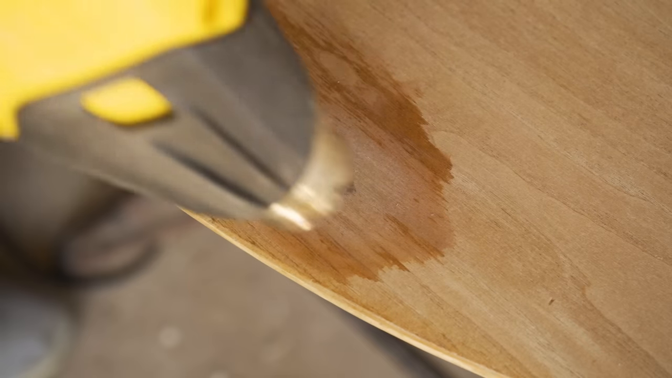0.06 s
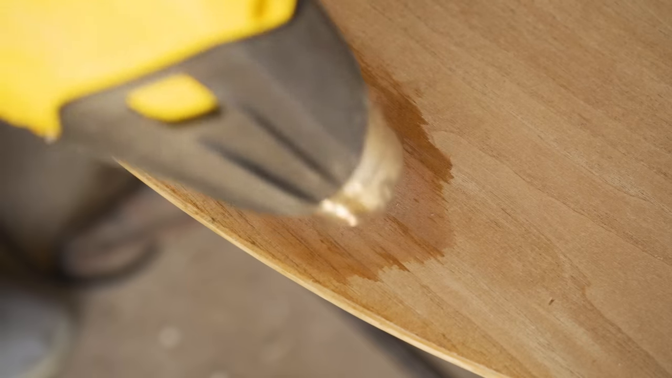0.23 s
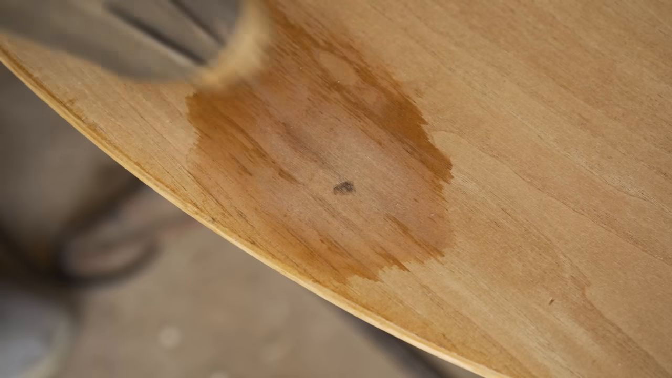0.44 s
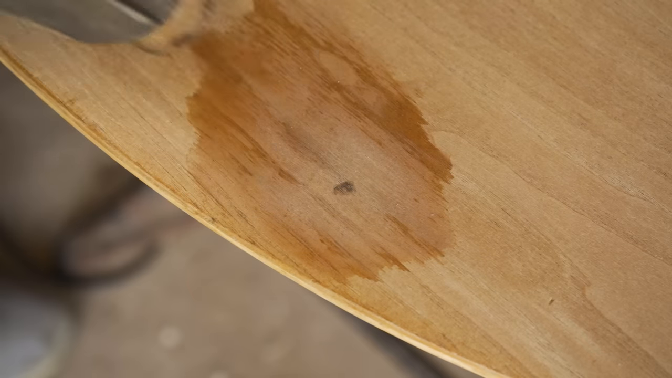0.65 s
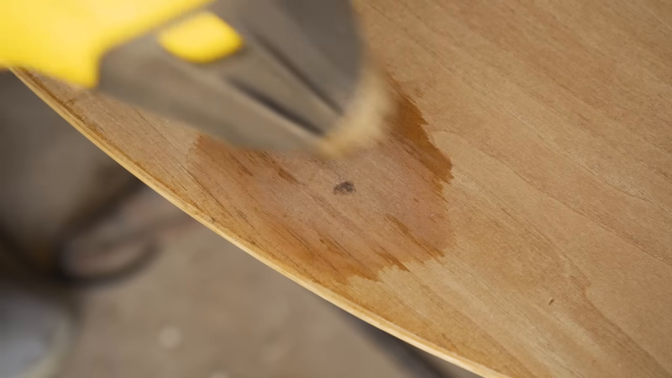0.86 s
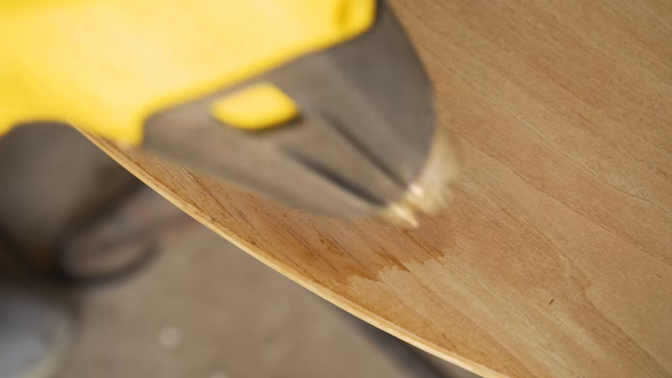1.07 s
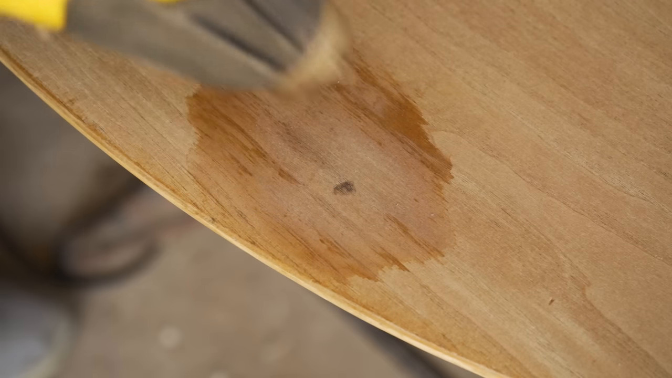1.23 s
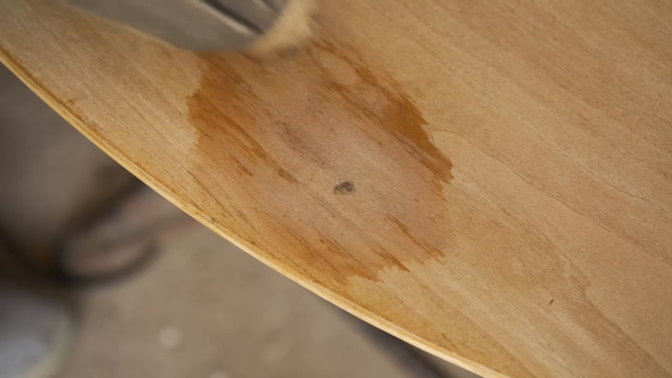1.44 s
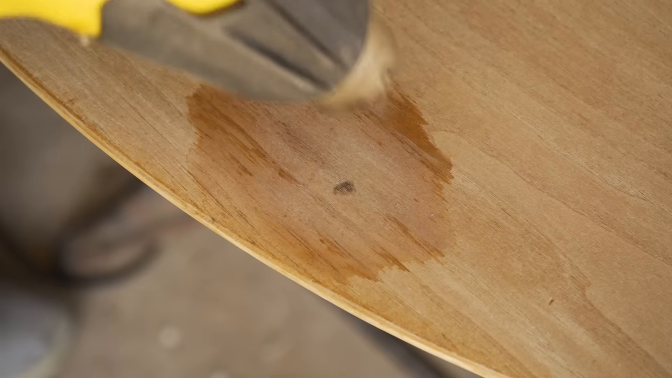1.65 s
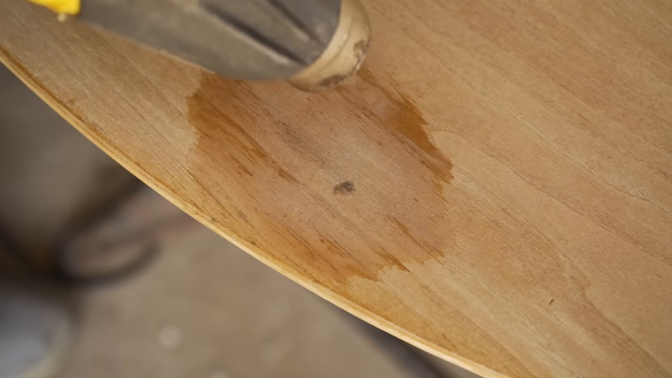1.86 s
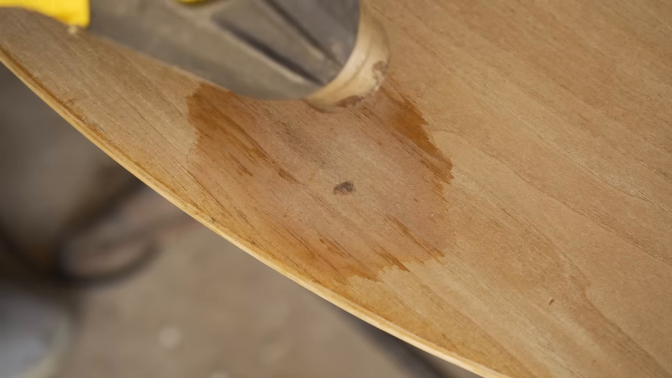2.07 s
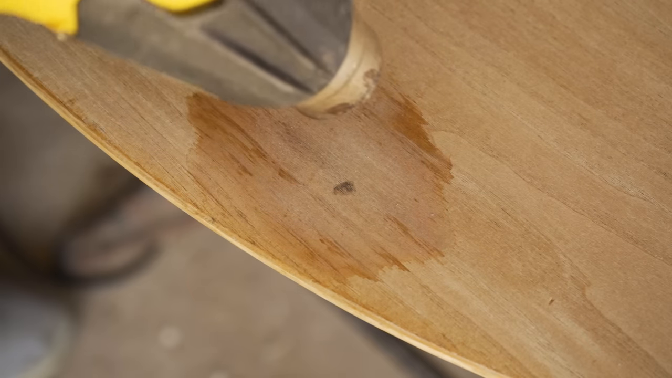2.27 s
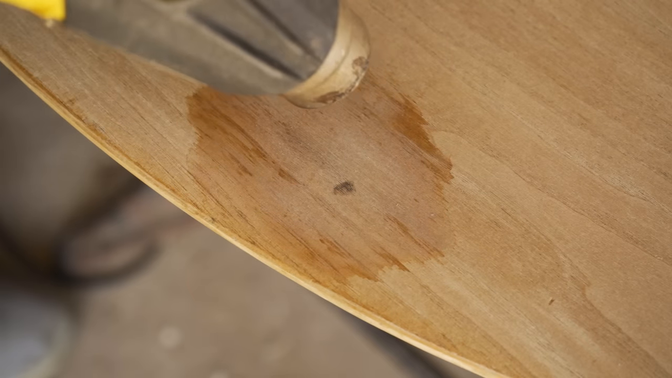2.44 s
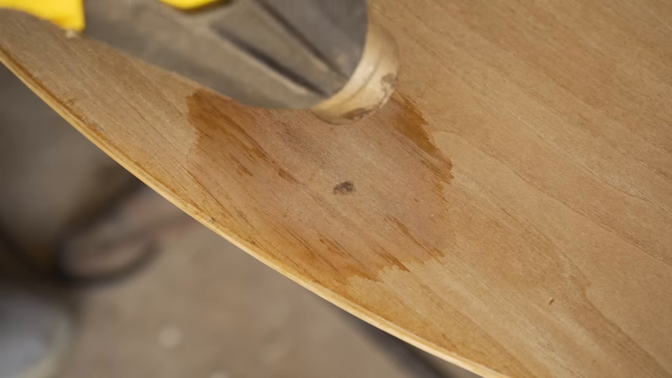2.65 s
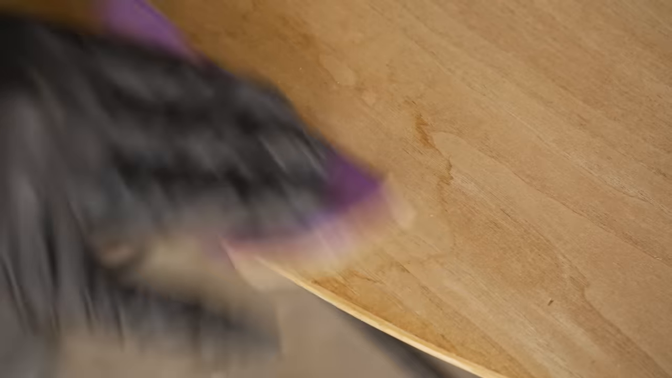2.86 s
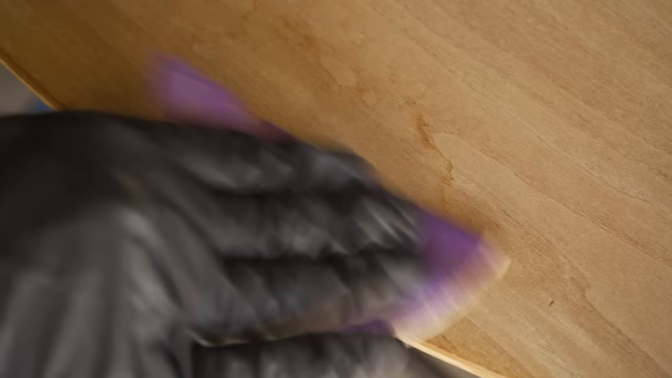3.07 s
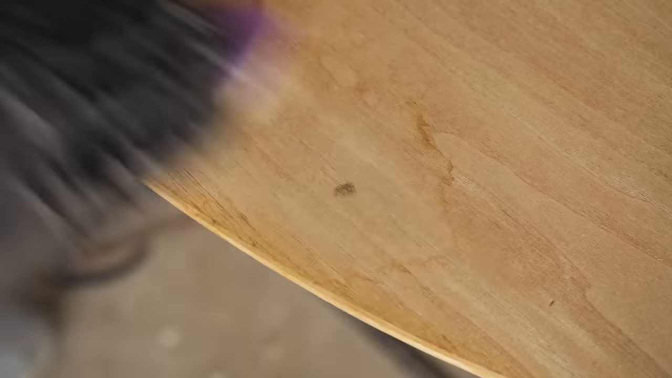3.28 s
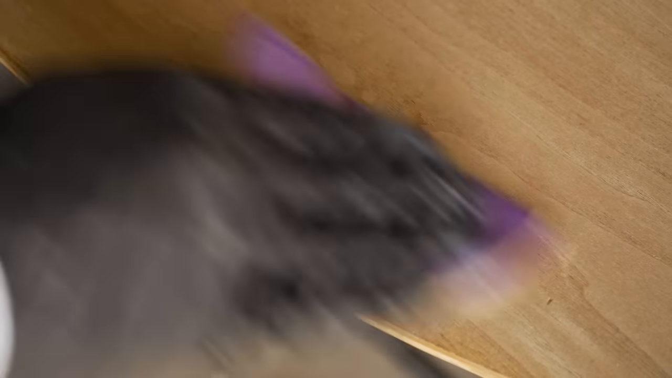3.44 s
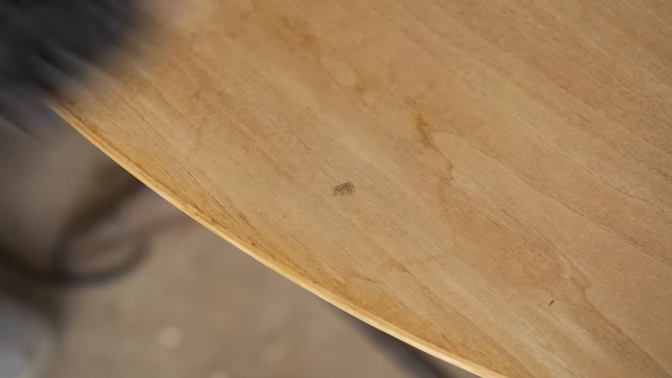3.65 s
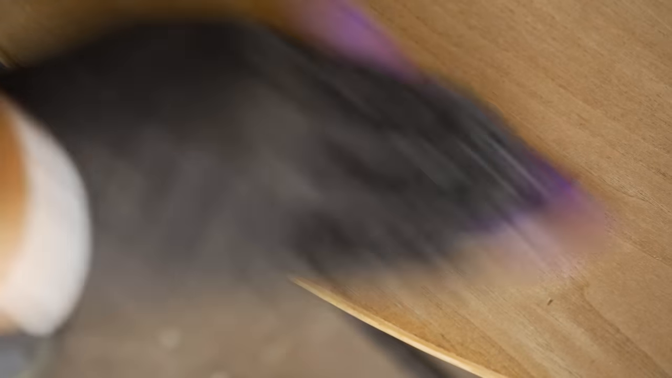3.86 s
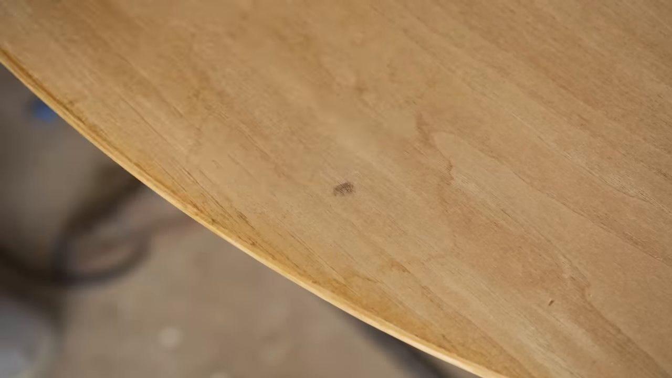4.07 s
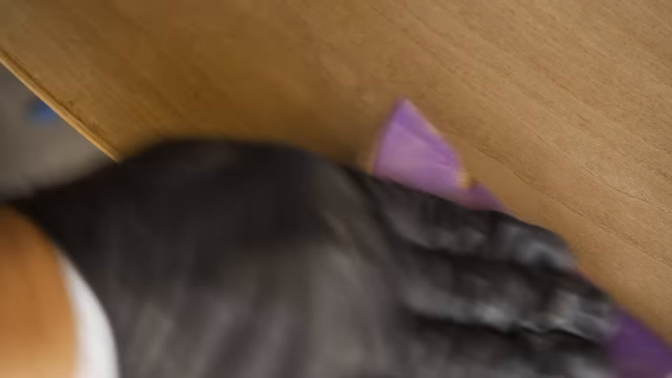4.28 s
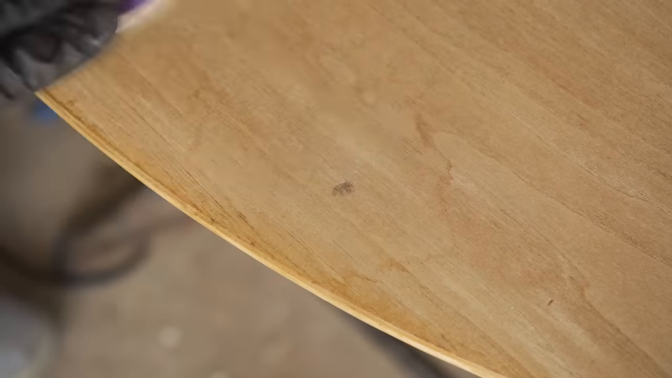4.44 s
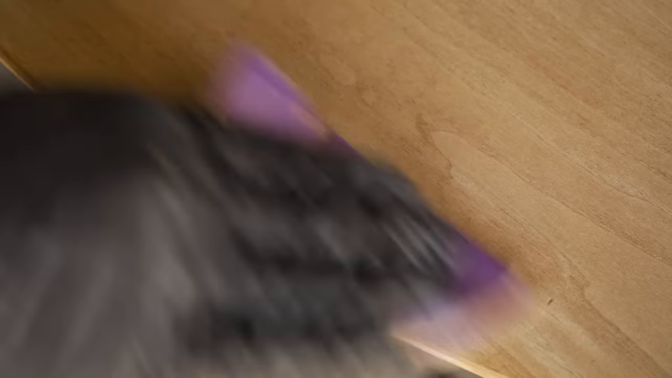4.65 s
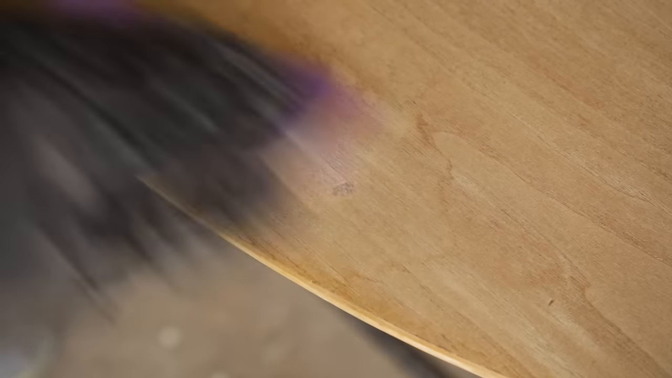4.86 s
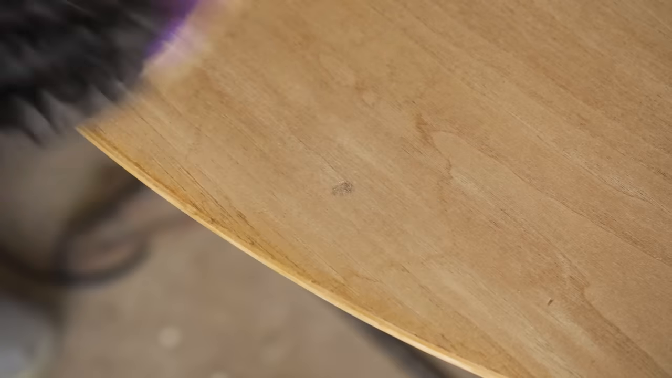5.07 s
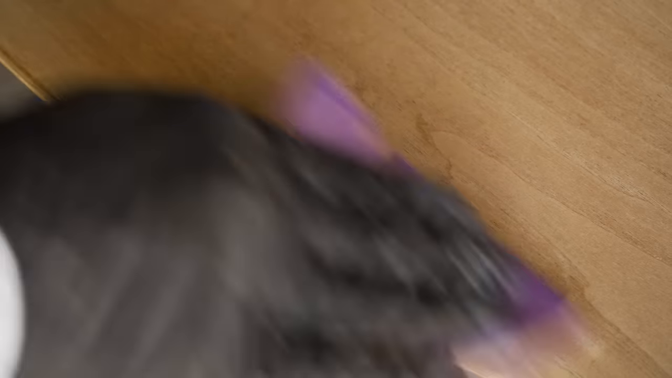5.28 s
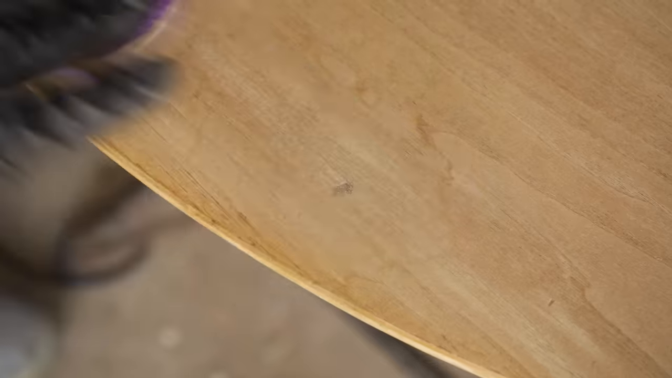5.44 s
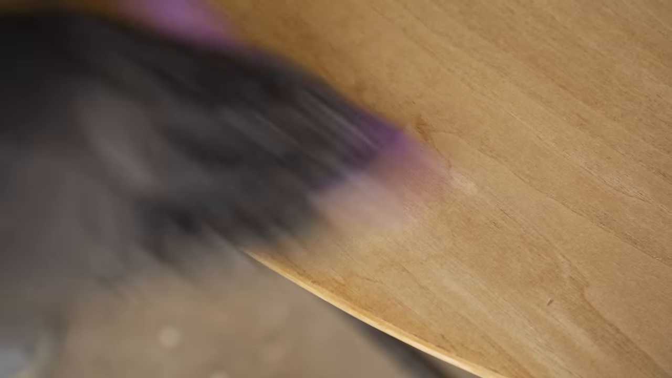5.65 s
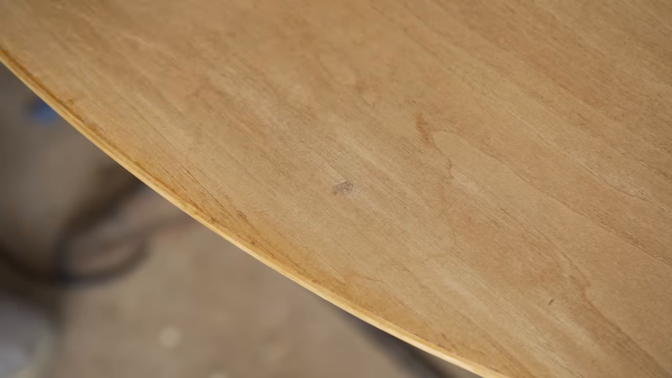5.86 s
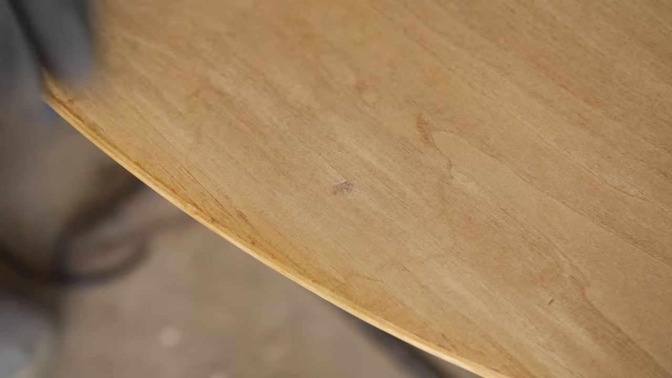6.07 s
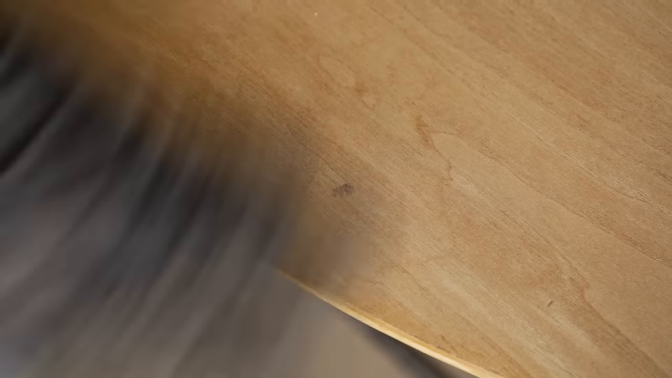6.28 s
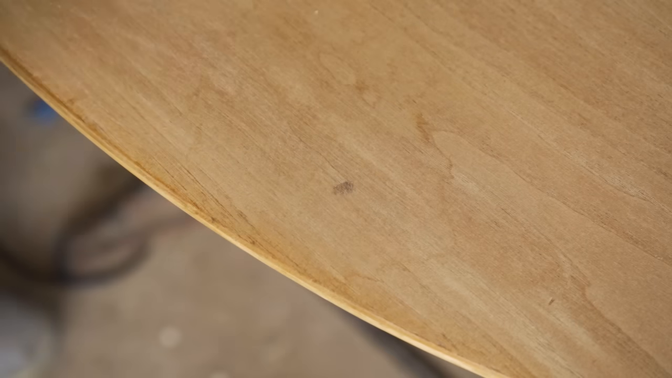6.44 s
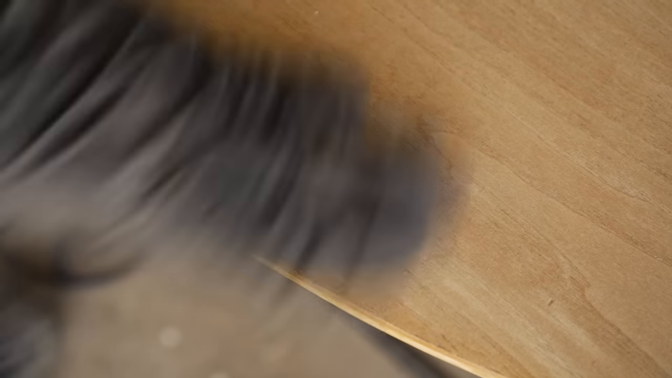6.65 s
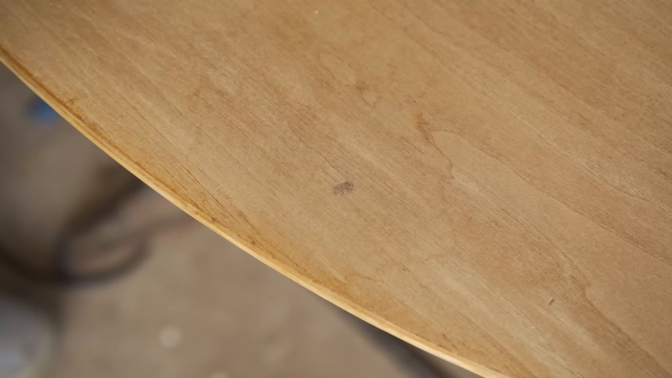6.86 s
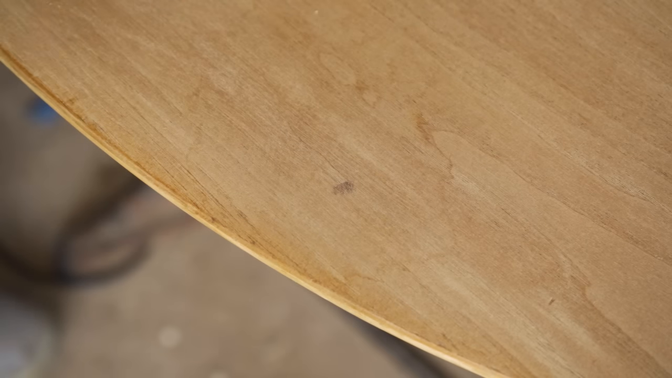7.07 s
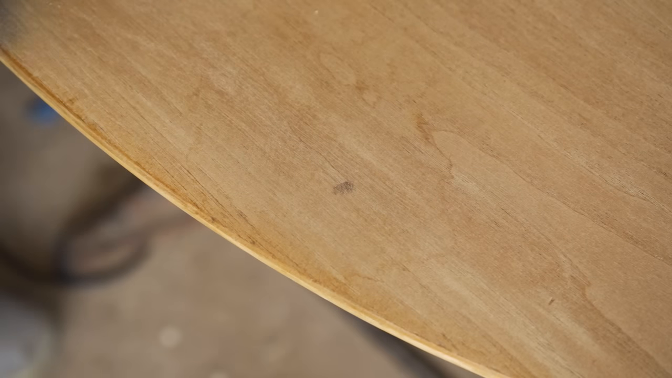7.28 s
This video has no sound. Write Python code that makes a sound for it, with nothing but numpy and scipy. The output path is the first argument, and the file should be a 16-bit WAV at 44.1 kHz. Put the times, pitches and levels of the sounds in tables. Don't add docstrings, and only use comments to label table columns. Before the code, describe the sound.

Close up in a small workshop, a hot-air gun blows with a steady roar, airy hiss and thin motor whine that swells slightly. It cuts off abruptly to fast sandpaper strokes on wood, alternating dry rasps about six a second. After another cut, a gloved hand wipes the tabletop twice, each swipe with a hollow woody thump, the second softer, then faint rustle and ticks.

```python
import sys
import numpy as np
from scipy import signal
from scipy.fft import rfft, irfft, next_fast_len
from scipy.io import wavfile
from scipy.ndimage import uniform_filter1d, map_coordinates

SR = 44100
rng = np.random.default_rng(int(sys.argv[2]) if len(sys.argv) > 2 else 0)


def invert_db(x):
    u = np.asarray(x, float) / 20
    return 10 ** u


def store_pcm(level_fs):
    pcm = np.round(np.clip(level_fs, -1, 1) * 32767).astype(np.int16)
    wavfile.write(sys.argv[1], SR, np.atleast_2d(pcm).T)


N = 322529
TIME = np.arange(N) / SR
GUN_END_S, SECOND_CHANGE_S = 2.833, 6.0
# (start [s], stop [s], scrape level [dB], fizz above scrape [dB])
STROKES = [(2.905, 3.002, -43.5, 0), (3.048, 3.148, -42.5, 1.5), (3.183, 3.287, -42.5, 2.5),
           (3.324, 3.46, -41, 1), (3.495, 3.653, -40, 1.5), (3.69, 3.853, -39, 3), (3.892, 4.089, -38, 0.5),
           (4.136, 4.323, -39, 3), (4.354, 4.516, -38.7, -0.5), (4.553, 4.682, -42.5, 5),
           (4.71, 4.841, -41.7, -0.1), (4.879, 5.001, -42.7, 4), (5.029, 5.149, -42, 0.2),
           (5.18, 5.307, -41, 3.5), (5.336, 5.475, -41, 0.7), (5.514, 5.641, -40.5, 3.5),
           (5.672, 5.849, -43, 2)]
# (start [s], stop [s], scrape level [dB], fizz above scrape [dB])
WIPES = [
    (6.296, 6.363, -40.5, 1.8),
    (6.688, 6.762, -44, .8),
]


def unit(x):
    return x / np.sqrt(np.mean(x ** 2) + 1e-20)


def along(points, hz):
    f, v = np.transpose(points)
    return np.interp(np.log(hz + 1), np.log(f + 1), v)


def curves(rows):
    s, *columns = np.transpose(rows)
    return [np.interp(TIME, s, column) for column in columns]


def held_db(start, stop, rise_db_s, fall_db_s):
    rising = rise_db_s * (TIME - start)
    falling = fall_db_s * (stop - TIME)
    return np.minimum(0, np.minimum(rising, falling))


def wobble(rate, size=N):
    coarse = np.arange(0, size / SR + .01, .002)
    knots = rng.standard_normal(int(size * rate / SR) + 5)
    return np.interp(TIME[:size], coarse, map_coordinates(knots, [coarse * rate]))


def filtered(x, response):
    m = next_fast_len(N + SR // 2, True)
    return irfft(rfft(x, m) * response(np.fft.rfftfreq(m, 1 / SR)), m)[..., :N]


def resonance(hz, centre, width):
    damping = 1j * hz * width
    return damping / (centre * centre - hz * hz + damping)


def rush(spectrum, patchy_db, grain_db=0):
    white = rng.standard_normal(N) * invert_db(grain_db * rng.standard_normal(N))
    z = signal.stft(white, nperseg=512)[2]
    field = uniform_filter1d(rng.standard_normal(z.shape), 6, 0)
    field = uniform_filter1d(field, 10, 1)
    patched = signal.istft(z * invert_db(patchy_db * unit(field)), nperseg=512)[1][:N]
    shape = [(10, -120)] + list(spectrum) + [(21000, -120)]
    return unit(filtered(patched, lambda hz: invert_db(along(shape, hz))))


def shop_hum():
    # (frequency [Hz], density [dB per Hz])
    hum = [(18, -55), (30, -19), (69, 6), (91, 9.5), (161, -8), (203, 4.5), (256, 8), (447, -5), (546, 1),
           (608, 4), (868, 0), (937, -10), (1200, -1), (1560, -9), (2640, -120)]
    return invert_db(-71.0) * rush(hum, 1.8) * (TIME > GUN_END_S)


def shop_rustle():
    # (frequency [Hz], density [dB per Hz])
    hush = [(350, -30), (600, -8), (789, -32), (930, -2), (1020, -9), (4490, -10), (14800, -24),
            (15800, -37)]
    quiet = (TIME > GUN_END_S) * invert_db(np.where(TIME < SECOND_CHANGE_S, -8, 0))
    level_db = -72.5 + wobble(3) + 1.1 * wobble(46)
    return quiet * invert_db(level_db) * rush(hush, 2.0, 4.2)


def shop_reverberation(x):
    # (frequency [Hz], t60 [s])
    decay = [(200, 1), (2000, 0.17), (5000, 0.4), (12000, 0.24)]
    hz, t, z = signal.stft(rng.standard_normal(SR // 2), SR, nperseg=256)
    fading = invert_db(-60 * t / along(decay, hz)[:, None])
    tail = signal.istft(z * fading, SR, nperseg=256)[1]
    delayed = np.pad(x, (300, 0))
    return signal.fftconvolve(delayed, tail / np.linalg.norm(tail))[:N]


def glove_ticks():
    # (time [s], peak level [dB], pitch [Hz], t60 [s])
    ticks = [(2.841, -34, 1370, 0.0065), (5.8094, -36, 4470, 0.0081), (5.856, -38, 2030, 0.0072),
             (5.992, -60, 3580, 0.006), (6.0965, -54, 3600, 0.008), (6.121, -52, 4420, 0.0066),
             (6.155, -47, 1820, 0.007), (6.3634, -39, 1000, 0.008), (6.394, -31.5, 4400, 0.011),
             (6.6399, -42, 1880, 0.0048), (6.787, -40, 1910, 0.0062), (6.9491, -56, 2070, 0.017),
             (6.9715, -44, 2400, 0.004), (6.997, -49, 2120, 0.0064), (7.047, -55, 2000, 0.015),
             (7.1336, -51, 1670, 0.015), (7.254, -47, 2320, 0.005)]
    out, t = np.zeros(N + SR), np.arange(SR // 20) / SR
    for s, db, hz, t60 in ticks:
        rough = 1 + 2.2 * uniform_filter1d(rng.standard_normal(len(t)), size=4)
        envelope = invert_db(db + 1 - 60 * t / t60) * (1 - np.exp(-t / 0.00031))
        out[round(s * SR):][:len(t)] += envelope * np.sin(2 * np.pi * hz * t) * rough
    return out[:N]


def board(hz):
    # (frequency [Hz], level [dB], t60 [s])
    top = [(92, -2, 0.67), (153, -5.5, 0.5), (243, -2, 0.55), (347, -6.5, 0.6), (624, -7.5, 0.12)]
    modes = [(c, 2.75 / t60, db) for c, db, t60 in top]
    modes += [(324, 29, -22.0), (629, 7.2, -1.5), (447, 1900, -16.0)]  # (frequency [Hz], width [Hz], level [dB])
    return sum((-1) ** k * invert_db(db) * resonance(hz, c, w) for k, (c, w, db) in enumerate(modes))


def table_knocks():
    # (time [s], peak level [dB], crack level [dB], centre of the blow [Hz])
    knocks = [(2.841, -46, 3.5, 780), (3.181, -46, -7, 233), (3.51, -35, -11, 620),
              (3.604, -47.5, -12, 152), (4.353, -47, -15, 790), (4.478, -50, -17, 624),
              (4.708, -47, -7, 156), (5.01, -58, -2, 250), (5.503, -57, -16, 336), (5.763, -53, -4, 298),
              (5.852, -40.5, 0.5, 395), (6.304, -28, -7.5, 178), (6.381, -25, -14, 270),
              (6.39, -24, -7.5, 230), (6.409, -35, -1, 267), (6.429, -34, -8.5, 256),
              (6.444, -37, -10, 156), (6.468, -36, -13.5, 247), (6.703, -37.5, -6, 240),
              (6.74, -40, -10, 725), (6.774, -28, -23, 280), (6.791, -37.5, -0.5, 156),
              (6.806, -33, -25, 563), (6.813, -29, -20, 332), (6.826, -37.5, -9, 600),
              (6.85, -44, -12, 620), (6.868, -41, -11, 300)]
    # (frequency [Hz], width [Hz], level [dB])
    clamp = (4500, 200, -15)
    crack_t60_s, rattle_db = .095, 3.5
    blows, cracks, t = np.zeros(N + SR), np.zeros(N + SR), np.arange(SR // 10) / SR
    for s, db, crack_db, hz in knocks:
        u = 2 * np.pi * hz * t
        force = np.sin(u) * np.exp(-.3 * u)
        blows[round(s * SR):][:len(t)] += invert_db(db + 17) * force
        lumpy = np.repeat(rng.standard_normal(len(t) // 90 + 1), 90)[:len(t)]
        level_db = db + crack_db - 60 * t / crack_t60_s + rattle_db * lumpy - 4.0
        cracks[round(s * SR):][:len(t)] += invert_db(level_db) * rng.standard_normal(len(t))
    c, w, db = clamp
    wood = [(250, 11.5), (600, 8.5), (1100, 8), (2500, 4.5), (4500, -5.5), (8000, -11.5), (15000, -40)]
    crack = filtered(cracks[:N], lambda hz: invert_db(along(wood, hz)) + invert_db(db + 16) * resonance(hz, c, w))
    return filtered(blows[:N], board) + crack


def table_shaking():
    push_jolt_db, pull_jolt_db, wipe_shake_db = -65, -70, -50.5
    lag_s, rise_db_s, fall_db_s = 0.022, 596, 196
    lumps = rush([(60, -16), (100, 4.5), (400, -6), (900, -26), (2000, -48)], 1.8) * invert_db(3.5 * wobble(45))
    moves = []
    for k, (start, *_) in enumerate(STROKES):
        jolt_db = pull_jolt_db if k % 2 else push_jolt_db
        moves.append(jolt_db + held_db(start + lag_s, start + lag_s, rise_db_s, fall_db_s))
    for start, stop, *_ in WIPES:
        moves.append(wipe_shake_db + held_db(start + lag_s, stop + .09, rise_db_s, 192))
    sanding_db = -72.5 + held_db(0, STROKES[-1][1], 1, fall_db_s)
    resting_db = -69.5
    steady_db = np.where(TIME > SECOND_CHANGE_S, resting_db, sanding_db)
    push = invert_db(np.max(moves, axis=0)) + invert_db(steady_db)
    return push * unit(filtered(lumps, board)) * (TIME > GUN_END_S)


def gun():
    # (time [s], rotation rate [Hz])
    shaft_rate = [(0, 221.0), (.4, 221.0), (.9, 221.25), (1.6, 221.2), (1.9, 221.7), (2.4, 221.35),
                  (2.84, 221.5)]
    # (multiple of the shaft rate [1], rms level [dB])
    harmonics = [(4, -64), (12, -68), (15, -80), (20, -79), (25, -75), (30, -83), (35, -82), (39, -84),
                 (43, -85), (45, -82), (46, -86), (47, -84), (48, -89), (49, -83), (50, -83), (51, -85),
                 (52, -87), (53, -82), (54, -87), (55, -79), (56, -84), (58, -83), (59, -79), (60, -82),
                 (61, -81), (62, -87), (63, -90), (65, -90), (67, -93), (70, -87)]
    # (frequency [Hz], density [dB per Hz])
    barrel = [(35, -62), (60, -20.5), (129, -13.5), (339, -9), (449, -8), (596, -2), (860, 2), (966, 0.5),
              (1390, 0.5), (2040, -6.5), (2450, -13), (2750, -7.5), (3200, -22), (4160, -36), (7040, -120)]
    # (frequency [Hz], density [dB per Hz])
    jet = [(1880, -38), (3200, -6), (3810, .5), (4650, -11), (5200, -8), (5500, -11), (5960, -6),
           (6630, -13), (7250, -11), (8260, -18), (9300, -17), (9960, -23), (13300, -28), (15800, -34)]
    # (from [s], to [s], facing [dB])
    waving = [(0, .04, 6), (.15, .22, 6), (.45, .52, 7.5), (.7, .79, 9), (.9, .94, 9), (1.29, 1.29, 8),
              (1.48, 1.57, 9), (1.79, 2.66, 5.5), (2.78, 2.83, 8)]
    roar_db, jet_db = -41, -52
    upper_swing, lower_swing = 1.25, .4
    turn_db_s = 90
    bounce_s, bounce_shortens, bounce_db = .00046, .024, -9
    n = round(GUN_END_S * SR)
    rest = (0, N - n)
    shaft = curves(shaft_rate)[0][:n] + .05 * wobble(8, size=n)
    turn = 2 * np.pi * np.cumsum(shaft) / SR
    facings = [db + held_db(a, b, turn_db_s, turn_db_s)[:n] for a, b, db in waving]
    facing_db = np.max(facings, axis=0).clip(0)
    lean_db = facing_db - facing_db.mean()
    whine = np.zeros(n)
    for k, db in harmonics:
        swing_db = 0
        if 57 < k < 64:
            swing_db = upper_swing * lean_db - 1
        elif 43 < k < 55:
            swing_db = lower_swing * lean_db - 1
        level_db = db + 2.5 + swing_db + 2 * wobble(4, size=n)
        whine += invert_db(level_db) * np.sin(k * turn + rng.uniform(0, 7))
    roar = rush(barrel, patchy_db=0.9)
    air = invert_db(roar_db + .3 * wobble(9)) * roar
    air += invert_db(jet_db + 1.2 * wobble(2.1)) * rush(jet, patchy_db=0.5)
    slow_lean_db = np.pad(uniform_filter1d(lean_db, size=SR // 6), rest)
    lag = bounce_s * (1 - bounce_shortens * slow_lean_db)
    air = air + invert_db(bounce_db) * np.interp(TIME - lag, TIME, uniform_filter1d(air, size=5))
    on = np.clip((GUN_END_S - TIME) / 0.0051, 0, 1)
    running_down_db = -57 + held_db(3, 3.12, 80, 87) + 3 * wobble(29.9)
    dying = (1 - on) * invert_db(running_down_db)
    return (air + np.pad(whine, rest)) * on + dying * roar


def rubbing():
    # (start [s], stop [s],
    # scrape level [dB], fizz above scrape [dB])
    brushes = [(2.84, 2.842, -39, 1.5), (6.092, 6.117, -75, 4), (6.151, 6.25, -71.5, -3),
               (6.62, 6.665, -72, -1), (6.672, 6.696, -70, -4), (7.134, 7.152, -61.5, -4),
               (7.194, 7.259, -64.5, -9.5)]
    # (frequency [Hz], density [dB per Hz])
    drag_spectrum = [(150, -52), (400, -22), (700, -10), (1100, -7.5), (1500, -2), (2000, 2.5), (2600, 6),
                     (3300, 0.5), (4500, -36)]
    # (frequency [Hz], density [dB per Hz])
    scrape_spectrum = [(1500, -45), (2400, -15), (3100, -4), (4200, .5), (5200, -1), (6200, -3),
                       (7500, -20), (10000, -50)]
    # (frequency [Hz], density [dB per Hz])
    fizz_spectrum = [(3500, -47), (5000, -65.5), (6500, 3.5), (8500, 1.5), (10000, -2), (13000, -30)]
    # (frequency [Hz], density [dB per Hz])
    airy_spectrum = [(6500, -44), (8800, -7.5), (10400, -4), (13800, -4.5), (15700, -8.5), (16000, -60)]
    # (scrape [dB], fizz [dB])
    push_grows, pull_grows, wipe_grows, brush_grows = (-2.2, 0.15), (2.2, -.2), (.8, 5.5), (-1.7, -1.2)
    push_rise_s, pull_rise_s = .0068, .0046
    strokes, wipes = len(STROKES), len(WIPES)
    rise = [.018] + [pull_rise_s, push_rise_s] * (strokes // 2)
    rise += [.0015] * wipes + [.003] * len(brushes)
    fall = [.0055] * (strokes - 1) + [.018]
    fall += [.005] * wipes + [.004] * len(brushes)
    grows = ([push_grows, pull_grows] * strokes)[:strokes]
    grows += [wipe_grows] * wipes + [brush_grows] * len(brushes)
    speed, knots = np.zeros(N), []
    for (start, stop, db, bright_db), up, down, grow in zip(STROKES + WIPES + brushes, rise, fall, grows):
        middle, half = np.array([db, db + bright_db]), np.array(grow) / 2
        edge = np.minimum((TIME - start) / up + 0.23, (stop - TIME) / down + 0.35)
        speed = np.maximum(speed, .5 + .5 * np.tanh(edge / 2))
        knots.append((.75 * start + .25 * stop, *(middle - half)))
        knots.append((.25 * start + .75 * stop, *(middle + half)))
    scrape_db, fizz_db = curves(sorted(knots))
    speed = speed + 0.005 * (TIME > GUN_END_S) * (TIME < STROKES[-1][1])
    catch = wobble(32)
    drag_db = np.minimum(-52.5 + 0.55 * (scrape_db + 40.5), scrape_db - 4)
    drag = invert_db(drag_db + 1.4 * wobble(30)) * speed ** 0.51 * rush(drag_spectrum, 0.39, 2.5)
    scrape_db = scrape_db + 0.13 * catch + 0.2 * wobble(33)
    scrape = invert_db(scrape_db) * speed ** 1.29 * rush(scrape_spectrum, 1.2, 4.5)
    fizz = invert_db(fizz_db - 3.5 + 0.65 * catch) * speed ** 1.88 * rush(fizz_spectrum, 1.6, 0.57)
    airy = invert_db(fizz_db - 3.5 + .3 * wobble(15)) * speed ** 2.3 * rush(airy_spectrum, 1.1, 2.2)
    return drag + scrape + fizz + airy


def scene():
    hand = rubbing() + table_knocks() + table_shaking() + shop_hum() + glove_ticks() + shop_rustle()
    mono = gun() + hand + invert_db(-20) * shop_reverberation(hand)
    return np.array([mono, mono])


def scattered(x):
    # (low edge [Hz], high edge [Hz], share of moments [1])
    bands = [(4100, 5300, .035), (5300, 7700, .015), (7000, 9500, .025), (11000, 13500, .04),
             (13500, 15800, .02)]
    hz, t, z = signal.stft(x, SR, nperseg=2048)
    loud = t < STROKES[-1][1]
    for low, high, share in bands:
        inside = ((hz > low) & (hz < high))[:, None]
        chosen = (rng.random(len(t)) < share) & loud
        allowed = (t > GUN_END_S) | (high < 10000)
        cell = inside & chosen & allowed
        z[:, cell] *= 1.5 * np.exp(2j * np.pi * rng.random((2, cell.sum())))
    return signal.istft(z, SR, nperseg=2048)[1][:, :N]


def band_limit(x):
    return signal.sosfilt(signal.butter(12, 16530, fs=SR, output="sos"), x)


def record(dry):
    hiss = invert_db(-84) * rng.standard_normal(dry.shape) * (TIME > SECOND_CHANGE_S)
    x = scattered(dry) + hiss
    x = filtered(x, lambda hz: (1j * hz / (72 + 1j * hz)) ** 3 * (hz < 15780))
    return band_limit(x)


dry = scene()
out = record(dry)
store_pcm(out)
```